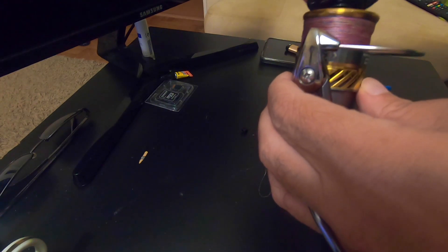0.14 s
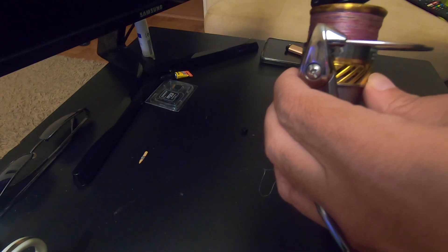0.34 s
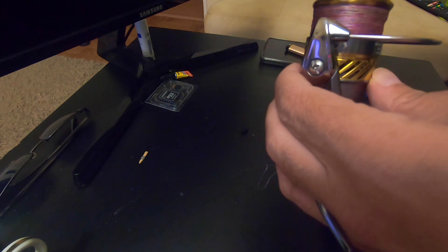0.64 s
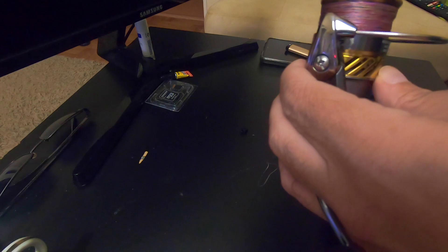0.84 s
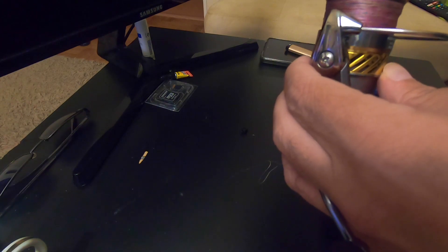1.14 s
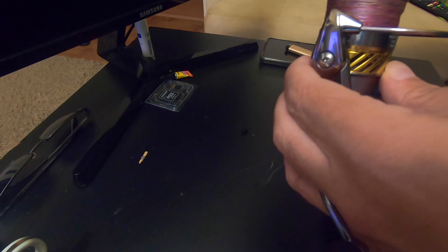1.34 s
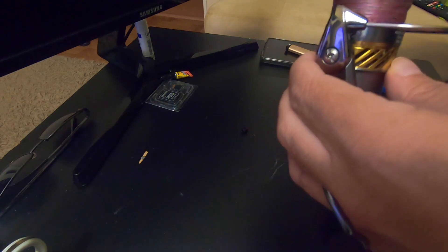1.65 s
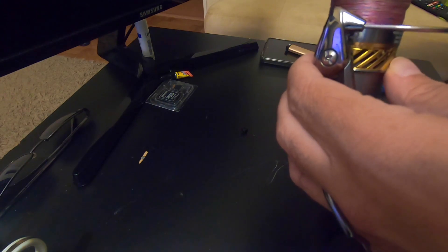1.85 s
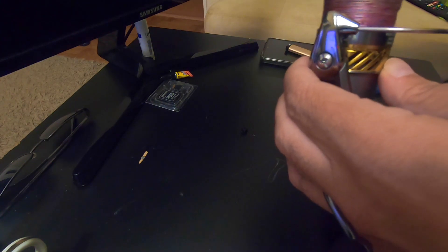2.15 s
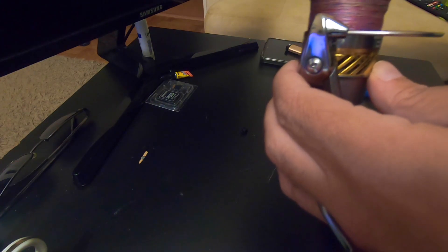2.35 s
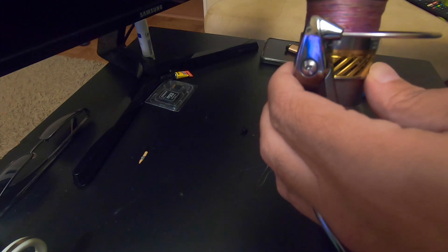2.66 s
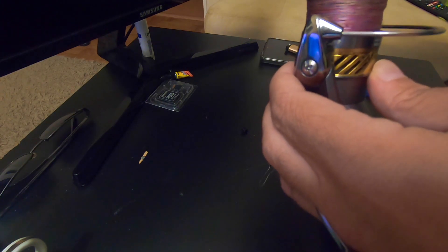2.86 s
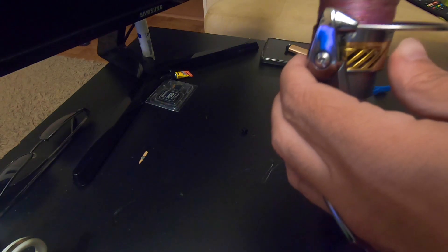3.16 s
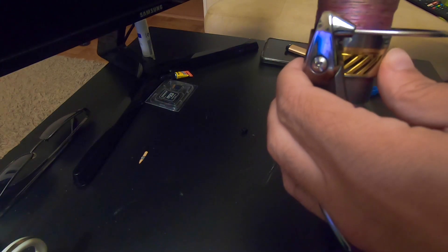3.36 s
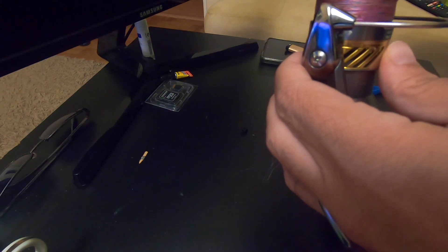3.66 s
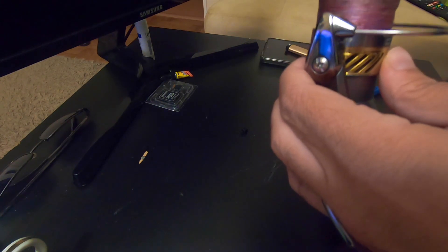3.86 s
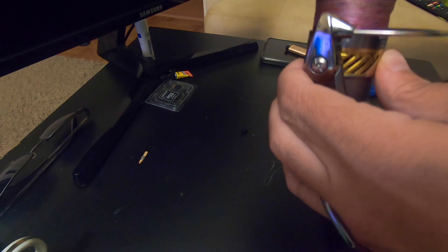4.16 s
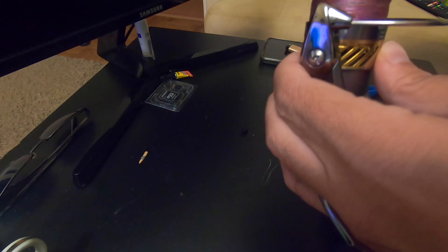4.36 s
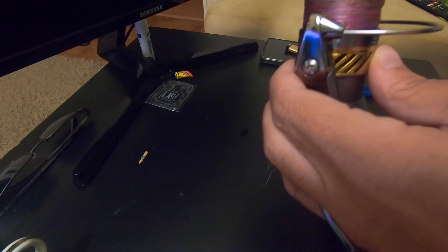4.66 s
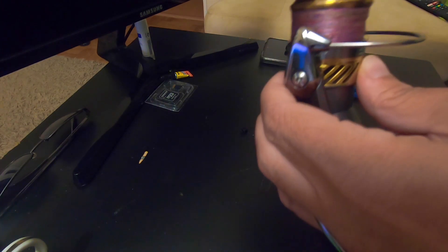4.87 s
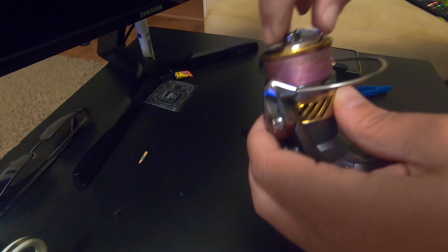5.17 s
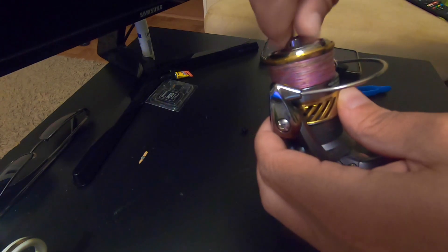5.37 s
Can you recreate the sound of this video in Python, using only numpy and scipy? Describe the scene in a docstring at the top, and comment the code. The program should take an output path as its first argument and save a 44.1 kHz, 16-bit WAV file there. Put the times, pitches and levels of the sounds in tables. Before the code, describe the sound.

A spinning reel is handled close up in a small, fairly dry room, over a very quiet, wavering low hum. Faint creaking starts around 0.5 s, with a hard double knock at 0.75-0.83 s and weaker taps near 1.1 and 1.4 s. One click at 1.53 s precedes a crunchy rattle at 1.6 s that leaves a thin metal wire ringing briefly. From 1.98 to 2.5 s the drag pawl snaps in separate, irregular clicks, growing firmer, with light finger ticks among them. After a pause, a click at 2.98 s leads into a fast ratchet run until 3.4 s. More runs follow at 3.86-4.18, 4.6-4.86 and 5.35-5.5 s, each speeding up and slowing unevenly, crisp, bright and metallic, with short room reflections. The pauses hold soft skin rubbing, tiny ticks, dull hand bumps and faint swelling high hiss.

```python
"""Ratchet clicks of a hand-twisted reel

A spinning reel creaks and knocks in the grip; then its drag pawl snaps over the ratchet teeth, one by one
at first, then in four quick twists. Each click is a sum of decaying modes with a burst of noise, and the
speed of the spool sets the click rate and brightness. A small room answers with reflections and a diffuse
tail. Shaped noise gives a low wavering hum, rubbing skin and a high hiss that swells in pauses."""
import sys
import numpy as np
from scipy import signal
from scipy.fft import rfft, irfft
from scipy.io import wavfile

SR = 44100
rng = np.random.default_rng(int(sys.argv[2]) if len(sys.argv) > 2 else 0)


def dump(signal):
    """Clip the signal to [-1, 1] and save it as 16-bit WAV at the path in sys.argv[1]."""
    limited = np.clip(np.atleast_2d(signal).T, -1, 1)
    pcm = np.round(limited * 32767).astype(np.int16)
    wavfile.write(sys.argv[1], SR, pcm)


N = 242991
TIME = np.arange(N) / SR
RING_TIME = TIME[:SR // 5]
BRISK_TEETH_PER_S = 66.4   # reference speed, that of a brisk twist

# Modes of the reel's body. Each row: frequency in Hz, relative level in dB, decay time t60 in seconds.
BODY_MODES = [(810, -12, 0.022), (860, -14.5, 0.021), (1170, -13, 0.029), (1434, -4, 0.016),
              (1710, -10, 0.011), (1802, 0.5, 0.014), (2127, -1, 0.023), (2260, -3.5, 0.017),
              (2518, 4.5, 0.015)]
# Modes of the spool before retuning. Each row: frequency in Hz, relative level in dB, t60 in seconds.
SPOOL_MODES = [(2190, -9.5, 0.0044), (2741, -3, 0.008), (3215, 2, 0.0099), (3356, 3.5, 0.0091),
               (3812, 0.5, 0.0092), (4145, -1.5, 0.0072), (4394, -4, 0.0057)]
# Dull noise of parts that bind and slip. Each row: frequency in Hz, relative density in dB per Hz.
CRUNCH_SPECTRUM = [(50, -36), (150, -21), (300, -19), (500, -25), (800, -10), (1200, -3), (2400, -1),
                   (4300, 3), (5200, -11), (8200, -18), (10500, -30), (15000, -45)]
# Fingers shifting their hold. Each row: start and end in seconds, ticks per second, mean tick level in dB.
FINGER_SHIFTS = [(2.147, 2.582, 20.4, -45.5), (2.601, 2.93, 25, -54), (3.721, 3.856, 53, -49.5),
                 (4.262, 4.578, 35, -56), (4.902, 5.34, 25.1, -56)]


def clicker():
    """Impact excitation of coupled parts: the pawl's snap rings pawl, ratchet, spool and faintly the body."""
    # Modes of the ratchet. Each row: frequency in Hz, relative level in dB, t60 in seconds.
    ratchet_modes = [(5426, -7, 0.0065), (6180, -4.5, 0.0059), (7300, -6, 0.0013), (7036, 2, 0.0058),
                     (7690, 2, .007), (8230, -8, 0.0066)]
    # Modes of the pawl at the brisk speed. Each row: frequency in Hz, relative level in dB, t60 in seconds.
    pawl_modes = [(8670, -2, 0.0063), (9440, 1.5, 0.0052), (9536, 3.5, 0.0063), (10040, -3, 0.0066),
                  (10430, -3, 0.0083), (12300, -14.5, 0.0019), (13740, -2.5, 0.0025)]
    # Noise of the contact itself. Each row: frequency in Hz, relative density in dB per Hz.
    contact_spectrum = [(40, -34.5), (150, -14), (500, -23.5), (900, -13.5), (1800, -6.5), (3300, 4.5),
                        (5000, 3), (9500, 6), (12000, 1), (14000, -0.5), (16000, -9.5)]
    # Shift of the spool's ring as it turns under the fingers. Each row: time in seconds, pitch ratio.
    spool_pitch = [(2.0, 1.07), (2.3, 1.12), (2.5, 1.054), (3.0, 1.25), (3.17, 0.983), (4.8, 0.97),
                   (5.5, 1.028)]
    body_under_spool_db, body_db_per_doubling = -14.5, 5.5   # speed also shakes the body
    pawl_rise_per_doubling = 0.0087   # share of the pawl's pitch

    s, speed, spool_db, ratchet_db, pawl_db = clicks()
    doublings = np.log2(speed / BRISK_TEETH_PER_S)
    force_db = np.mean([spool_db, ratchet_db, pawl_db], axis=0)
    body_db = spool_db + body_under_spool_db + body_db_per_doubling * doublings
    spool_tuning = np.interp(s, *np.transpose(spool_pitch))[:, None]
    pawl_tuning = 1 + pawl_rise_per_doubling * doublings[:, None]

    spool = strike(SPOOL_MODES, s, spool_db, rise_s=0.00039, detune=0.014, spread_db=3.0, skew=0.072,
                   tuning=spool_tuning)
    ratchet = strike(ratchet_modes, s, ratchet_db, rise_s=0.00028, detune=0.021, spread_db=0.5, skew=0.45)
    pawl = strike(pawl_modes, s, pawl_db + .5, rise_s=0.00047, detune=0.015, spread_db=3.3, skew=0.6,
                  tuning=pawl_tuning)
    body = strike(BODY_MODES, s, body_db, rise_s=0.00086, detune=0.048, spread_db=1.5, skew=0.27)
    contact = crack(contact_spectrum, s, force_db - 2, rise_s=0.00027, t60=0.013)
    return spool + ratchet + pawl + body + contact


def clicks():
    """Kinematics of the ratchet: columns of time, teeth per second and spool, ratchet and pawl level in dB."""
    # Spool eased over one tooth at a time. Each row: time in seconds, spool ring level in dB,
    # common level of pawl and ratchet in dB before the pawl's trim.
    single_clicks = [(1.5306, -27, -28), (1.9753, -25.5, -19.5), (2.019, -19, -16), (2.1585, -14, -17.5),
                     (2.2191, -12, -18.5), (2.3274, -12, -20), (2.373, -11, -16), (2.4187, -11, -17),
                     (2.4456, -8.5, -16.5), (2.491, -13.5, -14), (2.9839, -19.5, -17.5)]
    # Four quick twists of the wrist, one list each. Each row: time in seconds, spool speed in teeth per second.
    twist_speeds = [
        [(3.0392, 17.9), (3.096, 49.9), (3.119, 41.5), (3.214, 72.1), (3.266, 34.7), (3.341, 56.2),
         (3.402, 28.0)],
        [(3.857, 52.9), (3.88, 74.1), (3.932, 27.2), (4.011, 72.4), (4.021, 85.4), (4.117, 68.0), (4.185, 16.8)],
        [(4.6056, 41.8), (4.647, 104.1), (4.682, 58.4), (4.775, 70.7), (4.843, 59.6), (4.862, 24.7)],
        [(5.3494, 26.2), (5.378, 41.1), (5.448, 105.6), (5.49, 32.9), (5.511, 100.9)],
    ]
    # How freely the fingers let the parts ring, one list per twist. Each row: time in seconds,
    # spool ring level in dB, ratchet ring level in dB.
    free_rings = [
        [(3.04, -14, -12), (3.09, -13.5, -12.5), (3.14, -19, -9), (3.24, -24, -14), (3.4, -21, -15)],
        [(3.86, -21.5, -18.5), (3.95, -21.5, -12), (3.99, -15, -19), (4.08, -15, -16), (4.12, -12.5, -13.5),
         (4.18, -14.5, -18)],
        [(4.61, -21.5, -17), (4.68, -16, -16.5), (4.74, -18, -17), (4.81, -12.5, -13.5), (4.86, -17, -20)],
        [(5.35, -18, -21.5), (5.45, -13.5, -20.5), (5.51, -15.5, -23)],
    ]
    eased_teeth_per_s = 17
    singles = [(s, eased_teeth_per_s, spool_db, db, db) for s, spool_db, db in single_clicks]
    twists = [twist(speeds, ring) for speeds, ring in zip(twist_speeds, free_rings)]
    return np.vstack([singles] + twists).T


def twist(speeds, free_ring):
    """Integration of speed into angle: one click per tooth that passes, the pawl louder at higher speed."""
    brisk_pawl_db, pawl_db_per_doubling = -11, 3
    t = np.arange(speeds[0][0], speeds[-1][0], 1 / SR)
    teeth_passed = np.cumsum(np.interp(t, *np.transpose(speeds))) / SR
    s = np.interp(np.arange(teeth_passed[-1]), teeth_passed, t)
    speed = np.interp(s, *np.transpose(speeds))
    at, spool_db, ratchet_db = np.transpose(free_ring)
    pawl_db = brisk_pawl_db + pawl_db_per_doubling * np.log2(speed / BRISK_TEETH_PER_S)
    return np.transpose([s, speed, np.interp(s, at, spool_db), np.interp(s, at, ratchet_db), pawl_db])


def handling():
    """Superposition of the grip's sounds: knocks, a singing wire, creaks, finger ticks and bumps."""
    return knocks() + bail_wire() + creaks() + finger_ticks() + bumps()


def knocks():
    """Impact of loose parts: taking up play rings body and spool, with dull and bright contact noise."""
    # Parts knocking in the grip. Each row: time in seconds, body and spool level in dB before trims.
    knock_levels = [(0.4759, -39.5, -48), (0.4903, -41, -58), (0.569, -45.5, -45.5), (0.7493, -24, -10.5),
                    (0.8214, -17, -12.5), (0.828, -22, -15), (0.833, -30, -28), (1.0962, -28.5, -38),
                    (1.4402, -28.5, -40), (1.6136, -24, -24), (1.6239, -20, -25), (1.6294, -21.5, -26),
                    (1.6352, -21, -12), (1.6396, -23, -11.5), (2.577, -60, -27), (2.6043, -37, -42),
                    (2.805, -47.5, -44.5), (3.7077, -31, -37), (3.773, -54, -43), (4.923, -43, -36.5),
                    (5.0323, -44.5, -50.5), (5.08, -45.5, -30)]
    # Bright scuff of small metal parts. Each row: frequency in Hz, relative density in dB per Hz.
    scuff_spectrum = [(300, -38), (2000, -15), (5000, 1), (8000, 10), (9500, -3), (11500, -18.5),
                      (16000, -29.5)]
    s, body_db, spool_db = np.transpose(knock_levels)
    body = strike(BODY_MODES, s, body_db - 0.5, rise_s=0.00023, detune=0.033, spread_db=-0.5, skew=0.12)
    spool = strike(SPOOL_MODES, s, spool_db - 3.5, rise_s=0.00017, detune=.03, spread_db=1.5, skew=0.17)
    crunch = crack(CRUNCH_SPECTRUM, s, body_db - 9.5, rise_s=.0001, t60=0.036)
    scuff = crack(scuff_spectrum, s, spool_db - 9, rise_s=.0001, t60=0.012)
    return body + spool + crunch + scuff


def bail_wire():
    """Lightly damped resonance: one blow during the rattle sets the bail wire singing."""
    # Modes of the bail wire. Each row: frequency in Hz, relative level in dB, t60 in seconds.
    wire_modes = [(2620, -1, .13), (3250, -0.5, .14), (3900, -3.5, .17), (4120, -2, .19), (4270, -1, .19),
                  (4420, -3, .17)]
    hit_s, hit_db = 1.6356, -26
    return strike(wire_modes, [hit_s], [hit_db], rise_s=0.0012, detune=.012, spread_db=3.0, skew=0.38, size=8800)


def creaks():
    """Stick-slip friction: crowds of tiny slips, each a dull burst, merge into creaks."""
    # Slips in the reel. Each row: start and end in seconds, slips per second, mean level in dB.
    slips = [(0.47, 0.74, 110, -63.5), (0.822, 0.84, 430, -46), (1.403, 1.425, 310, -47),
             (1.56, 1.603, 250, -52.5), (1.603, 1.655, 440, -31), (1.624, 1.642, 630, -24.5)]
    return crack(CRUNCH_SPECTRUM, *scatter(slips, spread_db=3.5), rise_s=.0001, t60=0.028)


def finger_ticks():
    """Random light impacts: shifting fingers tick on the spool and ring its modes."""
    times, levels_db = scatter(FINGER_SHIFTS, spread_db=4.5)
    return strike(SPOOL_MODES, times, levels_db, rise_s=0.00059, detune=0.016, spread_db=-0.5, skew=.2)


def bumps():
    """Soft impact: the slow contact of the hand rings the low modes of the grip."""
    # Modes of the grip. Each row: frequency in Hz, relative level in dB, t60 in seconds.
    grip_modes = [(151, -0.5, 0.073), (217.5, 8, 0.084), (496, -2.5, 0.052)]
    # Bumps of the hand on the reel. Each row: time in seconds, level in dB.
    hand_bumps = [(0.826, -38), (3.162, -36.5), (4.235, -34), (4.918, -41)]
    return strike(grip_modes, *np.transpose(hand_bumps), rise_s=0.0013, detune=0.0173, spread_db=-1.5,
                  skew=0.36, size=4400)


def scatter(stretches, spread_db, count=32):
    """Poisson process: exponential gaps and random levels for at most `count` contacts per stretch."""
    times, levels = [], []
    for start, end, per_s, db in stretches:
        s = start + np.cumsum(rng.exponential(1, count)) / per_s
        contact_db = db + spread_db * rng.standard_normal(count)
        times.append(s[s < end])
        levels.append(contact_db[s < end])
    return np.concatenate(times), np.concatenate(levels)


def strike(modes, times, levels_db, rise_s, detune, spread_db, skew, tuning=1, size=700):
    """Modal synthesis: each blow sums decaying sines whose mix, pitch and phase between the ears vary."""
    t, rings = RING_TIME[:size], 0
    for hz, db, t60 in modes:
        pitch, strength, turn, side = rng.standard_normal((len(times), 4)).T[:, :, None]
        mode_hz = hz * tuning * (1 + detune * pitch)
        phase = 2 * np.pi * mode_hz * t + np.cumsum(turn, axis=0)   # start phase wanders from blow to blow
        decay = from_db(db + spread_db * strength - 60 * t / t60)
        rings = rings + decay * np.sin([phase + skew * side, phase - skew * side])
    return place(times, levels_db, rings * (1 - np.exp(-(t / rise_s) ** 2)))


def crack(spectrum, times, levels_db, rise_s, t60, size=600):
    """Broadband contact noise: hard surfaces meet and chatter in a brief decaying burst."""
    likeness = [(300, .2), (1200, 0.37), (3000, 1.0), (6000, 0.22), (13000, 0.18)]   # Hz, correlation
    grit = noise(spectrum, likeness, size=size * len(times)).reshape(2, -1, size)
    t = RING_TIME[:size]
    return place(times, levels_db, grit * from_db(-60 * t / t60) * (1 - np.exp(-(t / rise_s) ** 2)))


def place(times, levels_db, sounds):
    """Energy scaling: each stereo sound has the energy of one millisecond at its level in dB."""
    out = np.zeros((2, N + len(RING_TIME)))
    millisecond = SR / 1000   # in samples
    for s, db, sound in zip(times, levels_db, sounds.swapaxes(0, 1)):
        at = int(np.clip(s * SR, 0, N - 1))
        out[:, at:at + sound.shape[1]] += from_db(db) * np.sqrt(millisecond) * unit_energy(sound)
    return out[:, :N]


def ports(x):
    """Port resonance: the two microphone ports differ, and the right one turns phase around its resonance."""
    left = x[0] + 0.16 * resonance(x[0], 8700, 1100)
    right = x[1] - 1.67 * resonance(x[1], 9060, 1100)
    return np.array([left, right + 0.083 * resonance(right, 10700, 1000)])


def resonance(x, hz, width_hz):
    """Second-order resonance: a two-pole band-pass with gain 1 at its peak."""
    return signal.lfilter(*signal.iirpeak(hz, hz / width_hz, fs=SR), x + 1e-18)


def reverberate(source, tail_db, echo_db, count=3):
    """Directivity: each direction gets another mix of the reel's modes, and the room gathers them all."""
    return sum(room(source(), tail_db, echo_db) for _ in range(count)) / np.sqrt(count)


def room(x, tail_db, echo_db):
    """Room impulse response: smeared first reflections and a diffuse tail with its own decay in each band."""
    # Colour of the diffuse sound. Each row: frequency in Hz, relative level in dB.
    room_colour = [(200, 0), (900, 4), (2400, 1), (3600, -0.5), (5200, 1), (7000, -2), (8300, 0),
                   (9700, -3), (10800, 0), (12200, -4), (16000, -9.5)]
    # Reverberation time. Each row: frequency in Hz, t60 in seconds.
    room_t60 = [(200, 0.51), (1000, 0.26), (3000, 0.22), (8000, 0.23), (15000, 0.29)]
    # First reflections. Each row: delay in seconds, spread in seconds, level in dB before echo_db is added.
    reflections = [(.0088, 0.00088, -30.5), (0.016, 0.0019, -21)]
    size = SR // 2
    t, hz = TIME[:size], np.fft.rfftfreq(size, 1 / SR)
    likeness = [(200, -0.014), (1200, 0.14), (3000, 0.13), (7000, 0.15)]   # Hz, correlation
    diffuse = noise(room_colour, likeness, size=size)
    edges = np.r_[0, np.geomspace(300, SR / 2, 9)]   # band edges in Hz
    spectrum, tail = rfft(diffuse), 0
    for low, high in zip(edges, edges[1:]):
        band = irfft(spectrum * ((hz >= low) & (hz < high)), size)
        tail = tail + band * from_db(-60 * t / at_hz(room_t60, (low + high) / 2))
    build_up = 1 - np.exp(-t / 0.0039)
    response = from_db(tail_db) * unit_energy(tail * build_up)
    for delay, spread, db in reflections:
        window = np.exp(-.5 * ((t - delay) / spread) ** 2)
        response += from_db(db + echo_db) * unit_energy(diffuse[:, ::-1] * window)
    mono = x.mean(axis=0)[None]
    return signal.fftconvolve(mono, response, axes=1)[:, :N]


def rubbing():
    """Sliding friction: skin on the spool makes steady noise as long as the fingers shift."""
    # Colour of the rub. Each row: frequency in Hz, relative density in dB per Hz.
    rub_spectrum = [(1000, -11.5), (2500, -8), (3300, 4.5), (4500, -4.5), (8000, -16), (10500, -27.5),
                    (13000, -44.5)]
    under_ticks_db, fade_db_per_s = -16, 130
    gains = [swell(start, end, db + under_ticks_db, fade_db_per_s, fade_db_per_s)
             for start, end, _, db in FINGER_SHIFTS]
    return np.max(gains, axis=0) * noise(rub_spectrum, [(1, .6)], size=N)


def hiss():
    """Level-modulated noise: a high hiss falls off at the start and swells in pauses between later clicks."""
    # Colour of the hiss. Each row: frequency in Hz, relative density in dB per Hz.
    hiss_spectrum = [(2000, -21.5), (5000, -3.5), (8000, 2.5), (10000, 0.5), (11500, -32.5)]
    pause_s, delay_s = .4, .18   # shortest pause; crest after the click before it
    s = clicks()[0]
    crests = s[:-1][np.diff(s) > pause_s] + delay_s
    later_crests = crests[crests > s[1]]   # none before the second click
    gain = sum(swell(at, at, db=-64, rise_db_per_s=69.5, fall_db_per_s=59) for at in later_crests)
    gain = gain + swell(0, .06, db=-68.5, rise_db_per_s=0, fall_db_per_s=110)
    return gain * noise(hiss_spectrum, [(1, 0.1)], size=N)


def room_hum():
    """Shaped stationary noise: a low room hum whose level wavers slowly."""
    # Colour of the hum. Each row: frequency in Hz, relative density in dB per Hz.
    hum_spectrum = [(15, -8), (28, 0.1), (42, -11), (65, -16), (115, -20.5), (155, -7), (195, -2.5),
                    (260, -9.5), (360, -18), (560, -24), (700, -18.5), (850, -17), (1080, -25),
                    (2000, -27.5), (5000, -32.5), (9800, -34.5), (12000, -50), (16000, -60)]
    # Left-right likeness of the hum. Each row: frequency in Hz, correlation from -1 to 1.
    hum_likeness = [(30, 0.88), (55, -0.19), (80, -0.64), (150, -0.34), (250, -0.37), (500, -0.42),
                    (1000, -0.24), (8000, -0.25)]
    hum_db = -55
    return from_db(hum_db) * waver(depth_db=0.6, per_s=5) * noise(hum_spectrum, hum_likeness, size=N)


def background():
    """Superposition of independent noises: room hum, rubbing skin and hiss."""
    return room_hum() + rubbing() + hiss()


def swell(start, end, db, rise_db_per_s, fall_db_per_s):
    """Exponential envelope: a gain rises to its level, holds from start to end and sinks again."""
    rise_db = rise_db_per_s * np.maximum(start - TIME, 0)
    fall_db = fall_db_per_s * np.maximum(TIME - end, 0)
    return from_db(db - rise_db - fall_db)


def waver(depth_db, per_s, count=200):
    """Slow random modulation: a gain runs straight in dB between random points."""
    return from_db(depth_db * np.interp(TIME * per_s, np.arange(count), rng.standard_normal(count)))


def noise(spectrum, likeness, size):
    """Mid-side correlation: stereo noise of a given colour and left-right likeness, rms 1 over both channels."""
    hz = np.fft.rfftfreq(size, 1 / SR)
    mid, side = rfft(rng.standard_normal((2, size))) * from_db(at_hz(spectrum, hz))
    alike = np.clip(at_hz(likeness, hz), -1, 1)
    stereo = np.sqrt(1 + alike) * mid + np.sqrt(1 - alike) * side * [[1], [-1]]
    return unit_energy(irfft(stereo, size)) * np.sqrt(size)


def at_hz(points, hz):
    """Logarithmic frequency scale: read a curve between its points on a log-frequency axis."""
    f, value = np.transpose(points)
    return np.interp(np.log(np.maximum(hz, 1)), np.log(f), value)


def unit_energy(x):
    """Energy normalisation: the sum of squares, averaged over the channels, becomes one."""
    return x / np.sqrt(np.mean(np.sum(x ** 2, axis=-1)) + 1e-20)


def from_db(db):
    """Logarithmic level: decibels to amplitude gain."""
    return 10 ** (np.asarray(db) / 20)


def scene():
    """Direct and reverberant field: the reel through the ports, its room response and the background."""
    direct = ports(clicker() + handling())
    click_room = reverberate(clicker, tail_db=-13.5, echo_db=3.5)
    handling_room = reverberate(handling, tail_db=-13.5, echo_db=-1.0)
    return direct + click_room + handling_room + background()


def record(dry):
    """Saturation and band limiting: the tallest peaks are rounded off and the top is cut."""
    cutoff_hz = 16200
    rounded = dry / (1 + np.abs(dry / 1.05) ** 4) ** (1 / 4)
    low_pass = signal.ellip(10, .1, 70, cutoff_hz, fs=SR, output="sos")
    return signal.sosfilt(low_pass, rounded)


dry = scene()
out = record(dry)
dump(out)
```